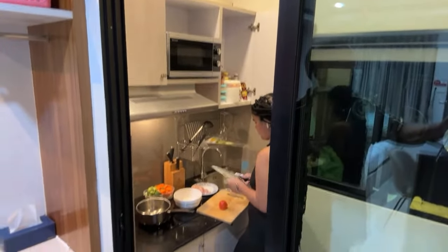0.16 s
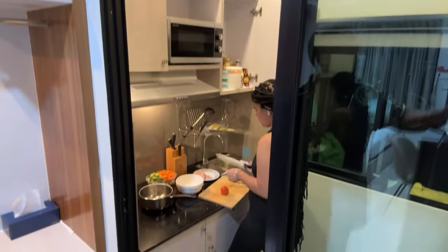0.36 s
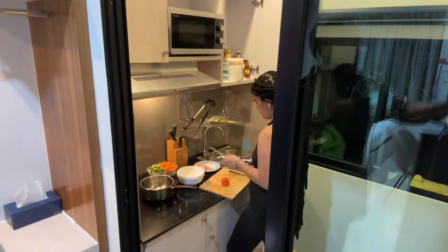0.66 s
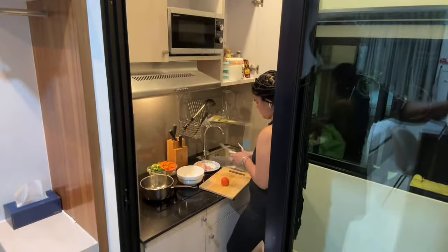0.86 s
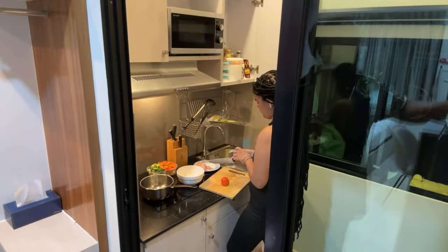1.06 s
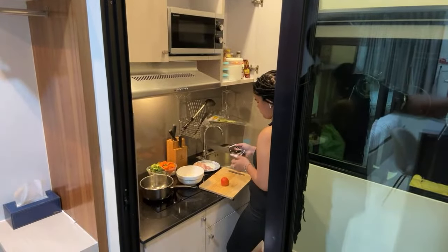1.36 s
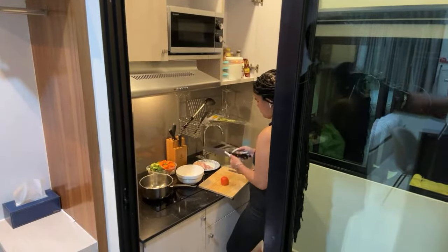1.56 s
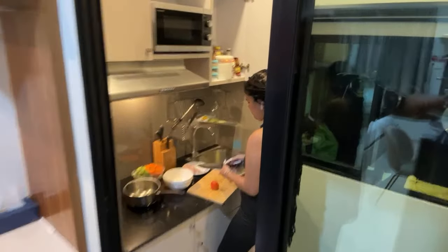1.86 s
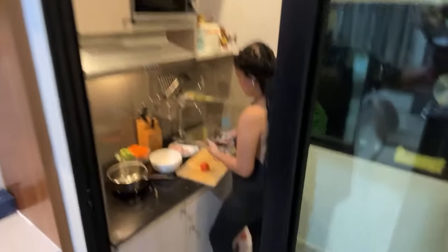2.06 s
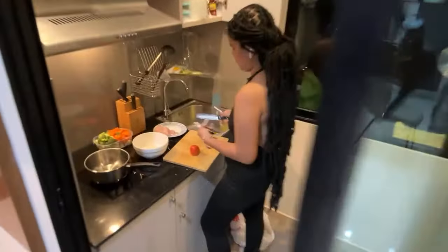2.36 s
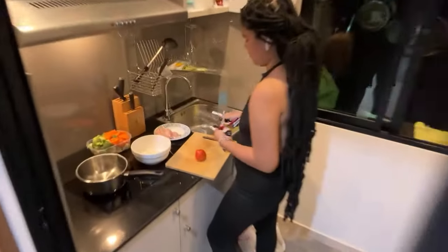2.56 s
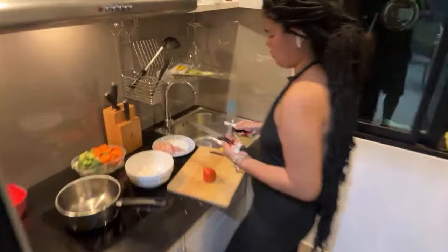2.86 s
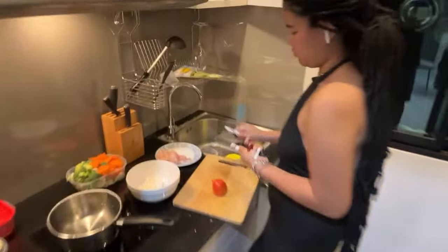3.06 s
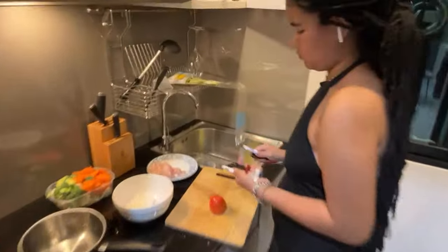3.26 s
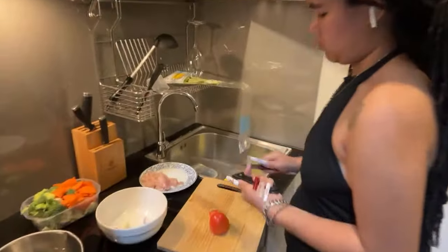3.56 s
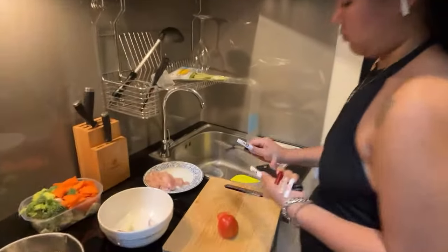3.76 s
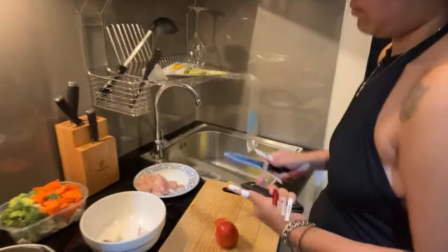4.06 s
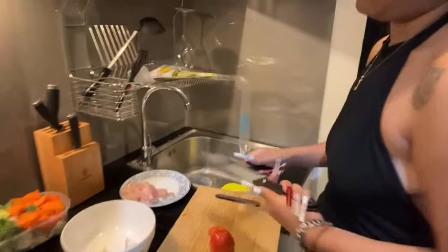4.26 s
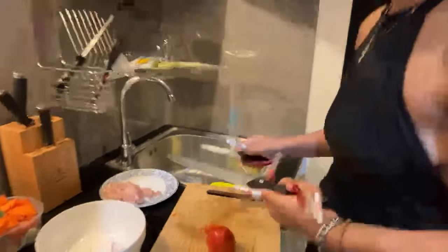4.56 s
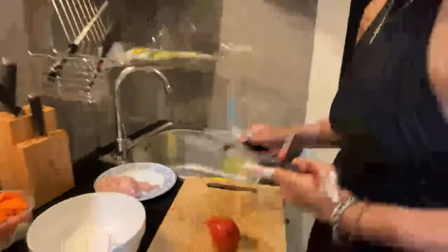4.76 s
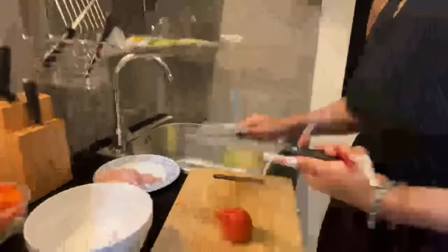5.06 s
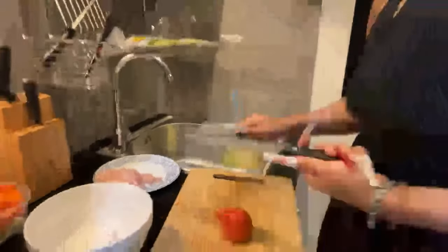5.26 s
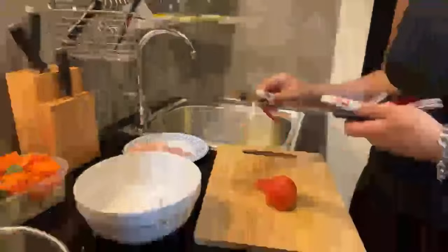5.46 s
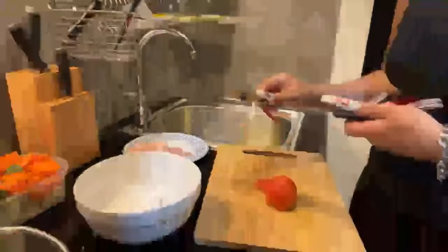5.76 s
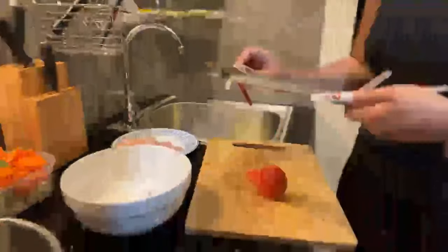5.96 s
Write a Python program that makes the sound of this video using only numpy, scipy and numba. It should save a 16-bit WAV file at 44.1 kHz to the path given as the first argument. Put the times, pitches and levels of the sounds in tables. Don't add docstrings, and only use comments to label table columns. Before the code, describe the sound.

A steel knife edge clicks into a handheld sharpener and scrapes through in short hissing, ringing strokes, over a soft fan hum in a small kitchen.

```python
import sys
import numpy as np
from scipy import signal
from scipy.fft import rfft, irfft
from scipy.io import wavfile
from scipy.ndimage import uniform_filter1d
from numba import njit

SR = 44100
rng = np.random.default_rng(int(sys.argv[2]) if len(sys.argv) > 2 else 0)


def store_pcm(level_fs):
    pcm = np.round(np.clip(level_fs, -1, 1) * 32767).astype(np.int16)
    wavfile.write(sys.argv[1], SR, np.atleast_2d(pcm).T)


def elevation(decibels):
    levels = np.asarray(decibels, float)
    return 10 ** (levels / 20)


N = 270137
TIME = np.arange(N) / SR

# start_s, build_up_s, hold_s, grit_db, ring_over_grit_db
PULLS = [(0, 0, 0.026, -72, 6), (.155, 0.027, 0.052, -42, -1), (0.501, 0.025, 0.073, -40.5, 0.5),
         (1.143, .014, 0.0061, -65, -6), (2.308, .03, .005, -75.5, 9), (2.458, 0.065, 0.0045, -69, -16),
         (2.627, 0.05, 0.074, -55.5, 9), (2.684, 0.072, 0.0044, -33.5, -3.5),
         (3.026, 0.086, 0.044, -39, -5), (3.821, .002, 0.029, -50, -1.5),
         (4.048, 0.0034, 0.017, -56.5, -1.5), (4.272, .017, .006, -52, 3), (4.395, 0.023, 0.095, -38.5, -4),
         (4.422, 0.013, 0.015, -46, -12.5), (4.73, .015, 0.006, -41.5, -9.5),
         (4.757, 0.00022, 0.079, -35.5, -3), (4.766, 0.0019, .01, -31.5, -12), (5.119, .03, 0.038, -30, -5),
         (5.441, 0.015, 0.045, -70.5, 9), (5.657, 0.033, 0.016, -47, 3), (5.694, 0.054, 0.017, -32, -1.5)]
# start_s, build_up_s, hold_s, rumble_db
HANDLE_SHAKES = [
    (2.62, 0.035, 0.038, -51),
    (2.773, 0.025, 0.031, -56),
    (4.103, 0.068, 0.13, -55),
    (4.407, .02, 0.1, -57),
    (4.879, 0.027, 0.11, -60.5),
    (5.146, 0.0034, 0.011, -30),
    (5.443, 0.0048, 0.037, -47),
    (5.596, .002, 0.26, -61),
]
# pitch_hz, level_db (per Hz)
GRIT_TONE = [(710, -52.5), (1200, -25), (2000, -13.5), (2430, -7), (3470, -1.5), (3830, 2.5), (4170, -1),
             (4600, 2.5), (6100, -1), (7490, -4), (11400, 6.5), (15200, 8), (16000, -3.5)]
# pitch_hz, level_db (per Hz)
RUMBLE_TONE = [(71, -33), (120, -4), (198, -7), (816, -3), (882, 0.5), (1190, -5.5), (1310, -3),
               (2600, -11.5), (3380, -35), (5720, -120)]
# pitch_hz, width_hz, level_db
BLADE_MODES = [(3650, 130, -21), (4720, 77, -22), (5420, 17, -14.5), (6150, 160, -20.5), (8430, 100, -15.5),
               (9900, 180, -20.5), (11350, 330, -17.5), (13100, 380, -15.5)]
# start_s, length_s, first_hz, last_hz, level_db
SINGING_MOMENTS = [(0.144, .09, 8500, 8500, -46), (.147, 0.044, 2500, 2460, -52),
                   (.17, .07, 4600, 4600, -51), (.478, 0.048, 2510, 2550, -32.5),
                   (0.503, .04, 11300, 11500, -56), (2.618, 0.029, 5390, 5480, -47),
                   (2.62, 0.14, 8000, 8140, -51.5), (2.719, 0.11, 3870, 3640, -41.5),
                   (3.005, 0.035, 8750, 8520, -50), (3.071, 0.027, 2400, 2420, -46.5),
                   (3.083, 0.081, 6010, 6100, -45), (4.758, 0.026, 2380, 2360, -35.5),
                   (4.762, .05, 6250, 5800, -34), (4.768, 0.05, 4850, 4660, -32.5),
                   (4.927, 0.14, 3970, 3950, -63), (4.928, 0.093, 2820, 2800, -59),
                   (5.095, 0.13, 4500, 4720, -36.5), (5.12, .08, 8200, 8300, -39),
                   (5.164, .045, 4930, 5230, -30.5), (5.574, .06, 3700, 3670, -49),
                   (5.704, .053, 2560, 2800, -35.5), (5.747, 0.068, 2840, 3020, -38),
                   (5.75, .029, 4700, 5030, -39), (5.782, 0.028, 5420, 5400, -30.5)]
# start_s, peak_db, ring_hz, top_edge_db, rattle_db
LANDINGS = [(0.139, -28, 2510, 0, -42.5), (0.4802, -24, 2670, -31, -37.5), (0.7814, -55, 4580, 13, -62.5),
            (1.078, -50, 2520, 5, -61), (2.403, -51.5, 2500, 5, -57), (2.614, -13, 3530, -4, -38),
            (3.003, -10, 6150, 3, -35), (4.2328, -15, 3480, -0.5, -40.5), (4.6859, -29, 5150, 10, -39.5),
            (5.0951, -11, 4640, 4, -29), (5.5695, -19.5, 3930, -22, -41.5)]
# start_s, peak_db, ring_hz, top_edge_db, low_knock_db
TICKS = [(0.1719, -24, 3470, -5, -7), (.482, -18.5, 4500, -10, -6), (.9844, -44, 2710, -20, -8),
         (1.191, -33, 3390, 7, -7), (1.3014, -45.5, 2940, -19, -9), (1.4551, -37, 2040, 14, -1),
         (1.5421, -30.5, 3450, 10, -26), (1.6769, -37, 3750, -15, 2), (1.7819, -52, 3060, 30, 6),
         (1.961, -69, 3550, -26, -5), (2.2969, -35.5, 4950, -25.5, -5.5), (4.76, -19, 2420, 0, -29),
         (4.9394, -32, 4000, -5, -21), (5.1517, -14, 2030, -4.5, -13), (5.1731, -23, 4770, -14, 7),
         (5.39, -57, 2330, -10, 23), (5.4202, -44.5, 2030, -3, 13), (5.4455, -39, 3030, -22, 15.5),
         (5.4958, -36.5, 3650, -16, 13.5), (5.5496, -35.5, 4870, -7, -16)]
# start_s, level_db, centre_hz, rise_s, fade_s
THUDS = [(1.189, -57, 4700, .002, 0.023), (1.68, -67, 3620, 0.0018, 0.031),
         (1.783, -65, 11600, .001, 0.016), (1.965, -68, 3500, 0.0044, .03), (2.295, -68, 5270, .001, 0.033),
         (2.41, -63, 3140, .01, 0.03), (2.62, -48.5, 1500, .01, .05), (2.63, -52, 1130, 0.013, .05),
         (2.84, -55.5, 840, .016, 0.077), (4.139, -50.5, 263, 0.013, 0.039),
         (4.26, -46.5, 3900, 0.01, 0.041), (5.151, -49, 299.6, 0.0028, 0.018),
         (5.152, -36, 1130, 0.0022, 0.048), (5.153, -44.5, 1400, .003, 0.056),
         (5.446, -43, 255, 0.0072, 0.034), (5.448, -48, 520, 0.0044, 0.04),
         (5.485, -54.5, 420, 0.0055, .026), (5.862, -50.5, 1330, 0.0037, 0.0098)]
# pitch_hz, time_to_fall_60_db_s
KITCHEN_DECAY = [(300, .35), (2000, 0.41), (6000, 0.43), (12000, 0.23)]
# pitch_hz, level_db (per Hz)
ROOM_TONE = [(15, -53), (25, -35.5), (50, -15.5), (97, -2), (141, -4.5), (200, -1), (277, -3.5),
             (384, -7.5), (591, -10), (1190, -15.5), (2050, -26.5), (3080, -30), (5140, -40.5),
             (11300, -47.5), (16000, -55)]
# start_s, level_db, stir_db
ROOM_TONE_LEVEL = [(0, -53.5, -1), (.1, -54, 4.5), (.9, -53.5, -0.5), (1.25, -54, 9), (1.6, -53, 7),
                   (2.2, -53.5, -3), (2.5, -52.5, 3.5), (3.1, -54.5, 11), (3.85, -57.5, -1),
                   (4.18, -54, 15), (4.35, -58, 21), (5, -55, 14), (5.4, -54.5, 5), (5.65, -58, 22),
                   (6.13, -57, 1)]
# pitch_hz, width_hz, level_db
FAN_HUMS = [(200.6, 24, -61), (379.7, 18, -65), (435.8, 14, -63), (2970, 45, -73), (5100, 450, -79),
            (5900, 250, -82), (6450, 250, -89.5), (8300, 200, -93)]
# closing_s, opening_s
MUTES = [
    (3.172, 3.826),
    (3.874, 4.048),
    (4.312, 4.404),
]


def unit(x):
    return x / np.sqrt(np.mean(x ** 2))


def colour(x, spectrum, lo_hz=0, hi_hz=SR):
    hz = np.arange(N // 2 + 1) * SR / N + 1
    table = np.array(spectrum)
    gain = elevation(np.interp(np.log(hz), np.log(table[:, 0]), table[:, 1]))
    edges = np.sqrt(1 / (1 + (lo_hz / hz) ** 8) / (1 + (hz / hi_hz) ** 8))
    return unit(irfft(rfft(x) * gain * edges, N))


@njit
def moving_band(x, hz, width):
    y, band_state, low_state = np.empty(len(x)), 0., 0.
    for i in range(len(x)):
        g, k = np.tan(np.pi * hz[i] / SR), width[i] / hz[i]
        v = (band_state + g * (x[i] - low_state)) / (1 + g * (g + k))
        band_state = 2 * v - band_state
        low_state += 2 * g * v
        y[i] = k * v
    return y


def band(x, hz, width_hz):
    centre_hz = np.clip(hz + np.zeros(N), 20, .45 * SR)
    return moving_band(x + 1e-18, centre_hz, width_hz + np.zeros(N))


def walk(rate):
    k = int(SR / rate)
    steps = np.repeat(rng.standard_normal(N // k + 1), k)
    return unit(uniform_filter1d(uniform_filter1d(steps, k), k)[:N])


def contact(start_s, build_s, hold_s, db, fall_db_s):
    t = TIME[:SR // 2]
    ease = np.minimum((t + 1e-4) / (0.57 * build_s + 1e-4), 1)
    rise_db = np.minimum(23.5 * (t / max(build_s, 1e-4) - 1), 0)
    fall_db = fall_db_s * np.maximum(t - build_s - hold_s, 0)
    gain = np.zeros(N + SR)
    start = int(start_s * SR)
    gain[start:start + len(t)] = elevation(db + rise_db - fall_db) * ease
    return gain[:N]


def pressure():
    let_go_db_s, rattle_db_s, handle_db_s = 277, 335, 199.5
    ring_db_s = let_go_db_s * (1 - 0.067)
    grit = sum(contact(s, build, hold, db, let_go_db_s) for s, build, hold, db, ring_db in PULLS)
    blade = sum(contact(s, build, hold, db + ring_db, ring_db_s) for s, build, hold, db, ring_db in PULLS)
    rattle = sum(contact(s, 0, 0, db, rattle_db_s) for s, peak_db, hz, top_db, db in LANDINGS)
    rattle_top = sum(contact(s, 0, 0, db - 5.5 + 0.46 * top_db, rattle_db_s)
                     for s, peak_db, hz, top_db, db in LANDINGS)
    shakes = sum(contact(*row, handle_db_s) for row in HANDLE_SHAKES)
    handle = elevation(-29.5) * grit + elevation(-12) * rattle + shakes
    squeak = elevation(-19.5) * blade + elevation(-8.5) * rattle
    ends_s = np.ravel([(s, s + build + hold) for s, build, hold, db, ring_db in PULLS])
    squeal_hz = np.interp(TIME, np.maximum.accumulate(ends_s), len(PULLS) * [2400, 2650])
    return grit + rattle_top, blade + rattle, handle, squeak, squeal_hz


def strokes():
    grit, blade, handle, squeak, squeal_hz = pressure()
    catch_size = elevation(1.6 * np.minimum(rng.exponential(size=N), 6))
    catches = unit(rng.standard_normal(N) * catch_size * elevation(1.5 * walk(260)))
    hiss = colour(catches, GRIT_TONE, lo_hz=7700) * elevation(0.35 * walk(60)) * grit
    ring = colour(catches, GRIT_TONE, hi_hz=6980) * elevation(0.27 * walk(60)) * blade
    rumble = colour(catches, RUMBLE_TONE, lo_hz=159) * elevation(2.0 * walk(70)) * handle
    squeal = unit(band(band(catches, squeal_hz, 330), squeal_hz, 330)) * squeak
    out = hiss + ring + rumble + squeal
    for hz, width_hz, db in BLADE_MODES:
        share = elevation(db - 3 + 3 * walk(45)) * (blade if hz < 6900 else grit)
        out += unit(band(catches, hz * (1 + 0.026 * walk(10)), width_hz)) * share
    small_modes_hz = np.geomspace(2100, 15000, 22) * elevation(.3 * rng.standard_normal(22))
    for hz in small_modes_hz:
        share = elevation(-23 + 7 * walk(25)) * (blade if hz < 6900 else grit)
        out += unit(band(catches, hz, 110)) * share
    return out


def singing():
    out = np.zeros(N)
    for s, length_s, first_hz, last_hz, db in SINGING_MOMENTS:
        span = slice(int(s * SR), int((s + length_s) * SR))
        along = (TIME[span] - s) / length_s
        hz = first_hz + (last_hz - first_hz) * along
        width_hz = 170 + 0 * along
        slips = rng.standard_normal(len(along))
        whistle = unit(moving_band(moving_band(slips, hz, 2 * width_hz), hz, width_hz))
        fade = np.minimum(along / 0.13, 1) * np.sqrt(np.abs(1 - along))
        out[span] += elevation(db) * whistle * fade
    return out


def ticks():
    out, t = np.zeros(N + SR), TIME[:SR // 5]
    landing_knock_db, landing_ring_db, tick_ring_db = -18.5, 1.5, 4.5
    rows = [(*row[:4], landing_knock_db, landing_ring_db) for row in LANDINGS]
    rows += [(*row, tick_ring_db) for row in TICKS]
    top = signal.butter(3, 7500, "high", fs=SR, output="sos")
    middle = signal.butter(2, [2100, 6800], "band", fs=SR, output="sos")
    low = signal.butter(2, [250, 1700], "band", fs=SR, output="sos")
    crack = 1.4 * np.exp(-t / .0012) + .15 * np.exp(-t / .01) + .04 * np.exp(-t / .03)
    for s, db, hz, top_db, low_db, ring_db in rows:
        noise = rng.standard_normal((4, len(t)))
        mode = signal.butter(1, [hz * .93, hz * 1.07], "band", fs=SR, output="sos")
        sound = elevation(ring_db) * 2.5 * signal.sosfilt(mode, noise[3] * np.exp(-t / .005))
        sound += signal.sosfilt(middle, noise[0] * crack)
        sound += elevation(top_db) * 0.11 * signal.sosfilt(top, noise[1] * crack)
        sound += elevation(low_db) * 3.3 * signal.sosfilt(low, noise[2] * np.exp(-t / 0.0047))
        start = int(s * SR)
        out[start:start + len(t)] += elevation(db - 14.0) * sound
    return out[:N]


def thuds():
    out = np.zeros(N)
    for s, db, hz, rise_s, fade_s in THUDS:
        t = np.maximum(TIME - s, 0)
        push = (1 - np.exp(-t / rise_s)) * np.exp(-t / fade_s)
        width_hz = .55 * hz
        body = unit(band(band(rng.standard_normal(N), hz, width_hz), hz, width_hz))
        out += elevation(db + 6.5) * push * body
    return out


def tail(t60_s, delay_s):
    t = TIME[:SR // 2]
    decay = np.exp(-np.log(1000) * t / t60_s) * np.clip(t / delay_s, 0, 1)
    response = rng.standard_normal(len(t)) * decay
    return response / np.sqrt(np.sum(response ** 2))


def kitchen(x):
    ranges_hz = [(50, 800), (800, 3500), (3500, 8500), (8500, 18000)]
    response = 0
    for edges, (hz, t60_s) in zip(ranges_hz, KITCHEN_DECAY):
        part = signal.butter(2, edges, "band", fs=SR, output="sos")
        response = response + signal.sosfilt(part, tail(t60_s, 0.002))
    return x + elevation(-15.5) * signal.fftconvolve(x, response)[:N]


def room_tone():
    s, level_db, stir_db = np.transpose(ROOM_TONE_LEVEL)
    base_db = -53.0
    out, swell = np.zeros(N), walk(0.42)
    spectrum = rfft(colour(rng.standard_normal(N), ROOM_TONE))
    octaves = np.log2(np.arange(N // 2 + 1) * SR / N + 1)
    for octave in np.arange(4.5, 14.5, .5):
        part = irfft(spectrum * np.clip(1 - 2 * np.abs(octaves - octave), 0, 1), N)
        bright_db = np.clip((octave - 10) / 2, 0, 1) * np.interp(TIME, s, stir_db)
        out += part * elevation(0.19 * swell + 1.9 * walk(6.2) + 0.92 * walk(22) + bright_db)
    out *= elevation(base_db)
    for centre_hz, width_hz, db in FAN_HUMS:
        wavering_hz = centre_hz * (1 + 0.007 * walk(3))
        out += unit(band(rng.standard_normal(N), wavering_hz, width_hz)) * elevation(db + 1.0 * walk(6))
    return out * elevation(np.interp(TIME, s, level_db) - base_db)


def scene():
    return (kitchen(strokes() + singing() + ticks() + thuds()) + room_tone())[None]


def band_limit(x):
    return signal.sosfilt(signal.butter(12, 16800, fs=SR, output="sos"), x)


def record(dry):
    heard = signal.sosfilt(signal.butter(3, 55, "high", fs=SR, output="sos"), dry[0])
    heard += elevation(-79.5 + 1.5 * walk(3)) * band(rng.standard_normal(N), 10000, 9000)
    gate = np.ones(N)
    for close_s, open_s in MUTES:
        gate *= np.interp(TIME, [close_s, close_s + 0.022, open_s, open_s + 0.011], [1, 0, 0, 1])
    cut = heard * gate
    wet = cut + elevation(-11) * signal.fftconvolve(cut, tail(0.16, 0.0087))[:N]
    wet = signal.sosfilt(signal.ellip(8, .2, 35, 15750, fs=SR, output="sos"), wet)
    return band_limit(wet[None])


dry = scene()
out = record(dry)
store_pcm(out)
```